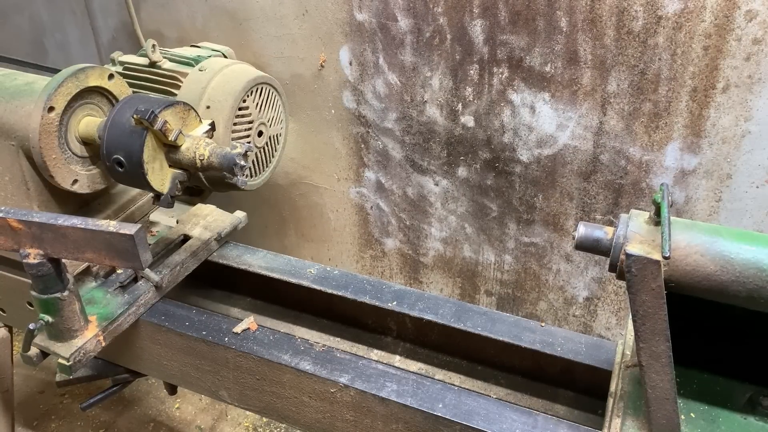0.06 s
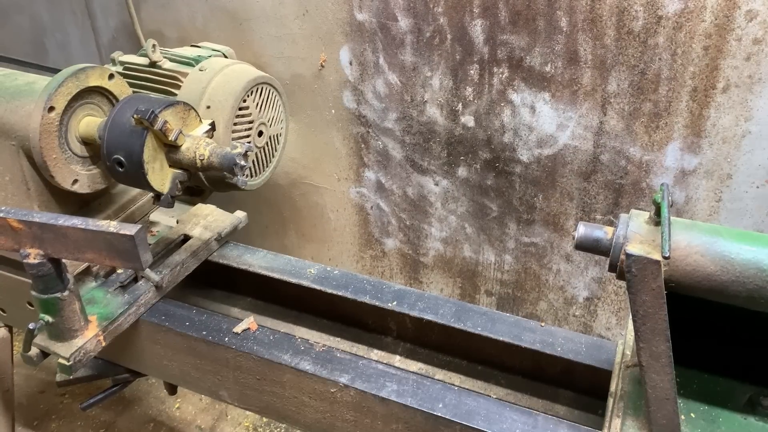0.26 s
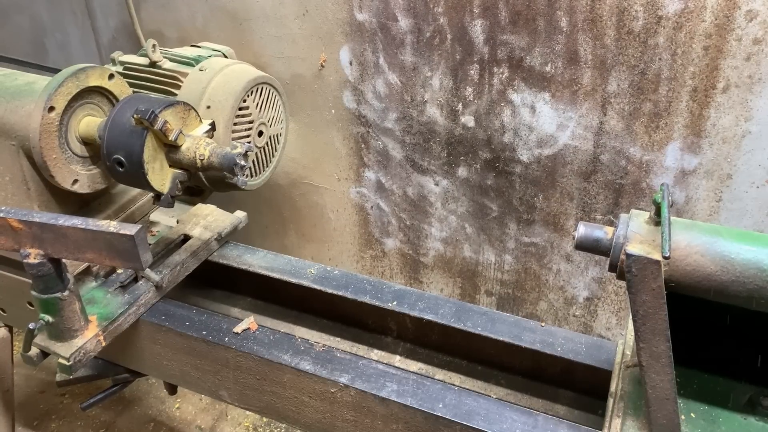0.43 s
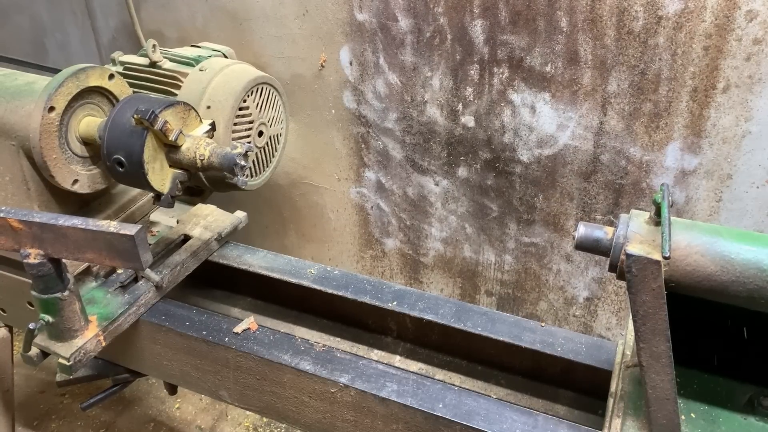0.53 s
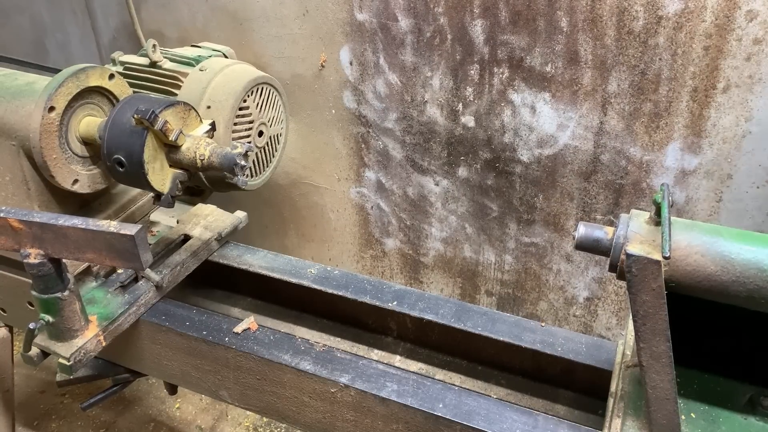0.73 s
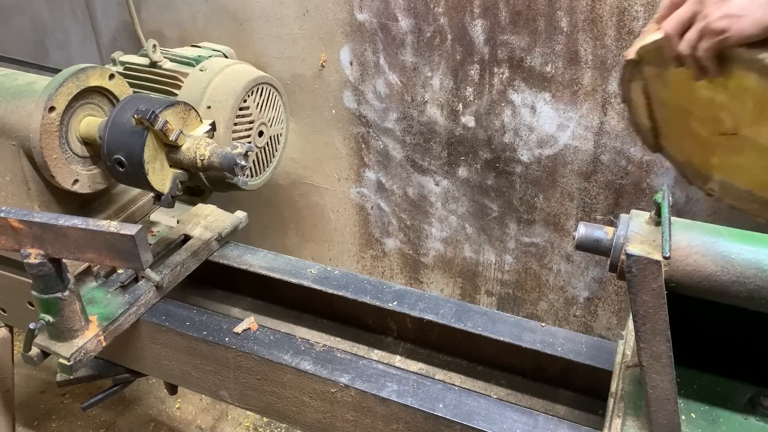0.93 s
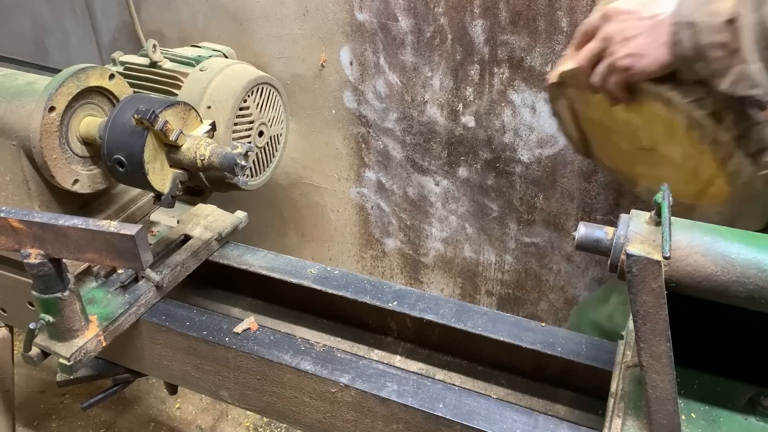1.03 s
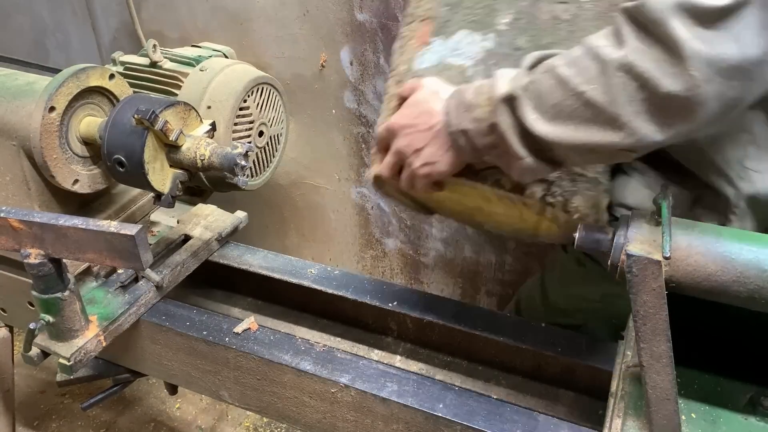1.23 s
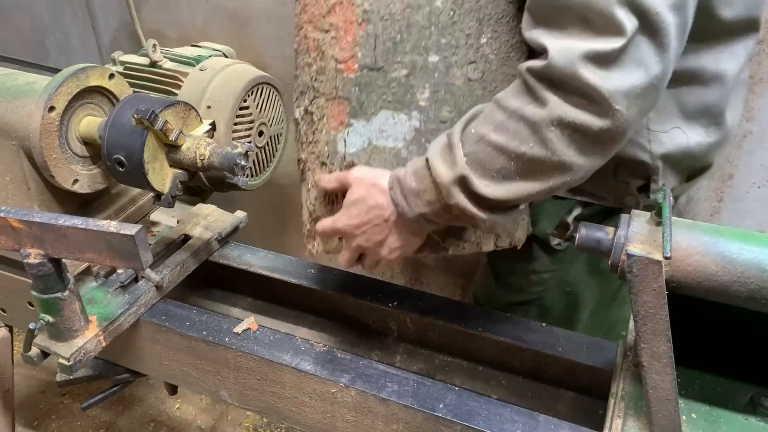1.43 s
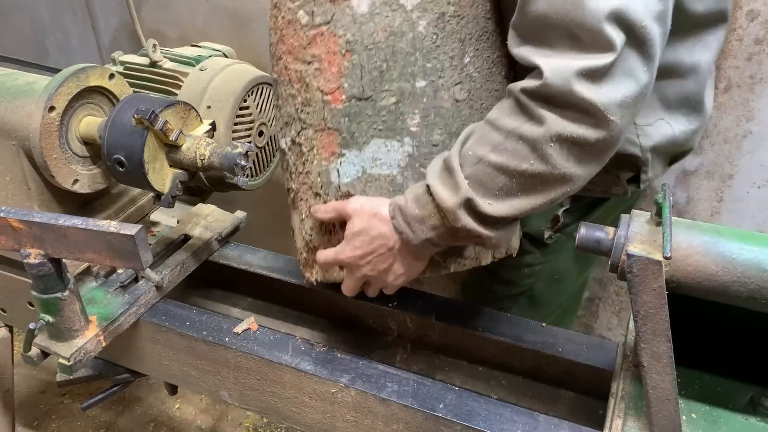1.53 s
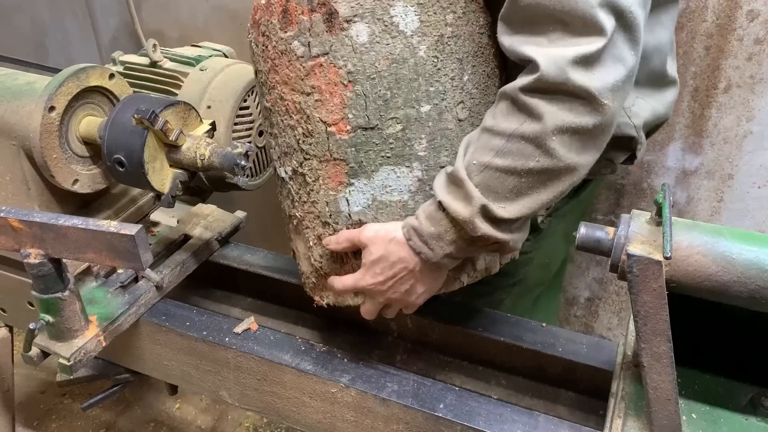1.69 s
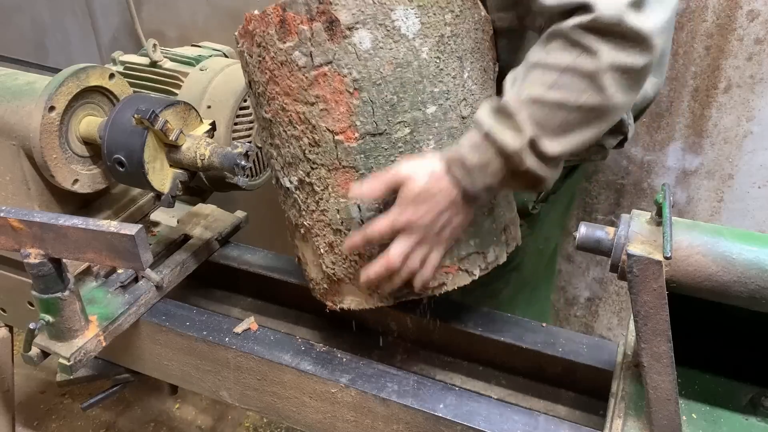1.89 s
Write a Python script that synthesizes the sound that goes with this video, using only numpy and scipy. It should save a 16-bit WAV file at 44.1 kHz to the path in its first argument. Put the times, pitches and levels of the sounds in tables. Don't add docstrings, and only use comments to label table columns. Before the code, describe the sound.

Loud clattering log knock near the start, smaller knocks just after, a tiny bird chirp outside, then sparse soft taps, scrapes and dull thuds in a lightly reverberant workshop, stereo phone pickup, left side softer.

```python
import sys
import numpy as np
from scipy import signal
from scipy.fft import rfft, irfft
from scipy.io import wavfile
from scipy.ndimage import uniform_filter1d

SR = 44100
rng = np.random.default_rng(int(sys.argv[2]) if len(sys.argv) > 2 else 0)


def to_linear_factor(level_db):
    exponent = np.asarray(level_db, float) / 20
    return 10 ** exponent


def transcribe(u):
    v = np.clip(np.atleast_2d(u).T, -1, 1)
    q = np.round(v * 32767).astype(np.int16)
    wavfile.write(sys.argv[1], SR, q)


N = 85995


def evened(x):
    return x / np.sqrt(np.mean(x ** 2) + 1e-20)


def smooth_noise(shape, size):
    return evened(uniform_filter1d(rng.standard_normal(shape), size=size))


def read(points, hz):
    f, value = np.transpose(points)
    return np.interp(np.log(hz + 1), np.log(f + 1), value)


def add(mix, s, sound):
    part = mix[..., round(s * SR):][..., :sound.shape[-1]]
    part += sound[..., :part.shape[-1]]


def ring(hz, t60, rise_s=0.):
    t = np.arange(round(t60 * SR)) / SR
    rise = np.minimum(t / (rise_s + 1e-9), 1)
    return to_linear_factor(-60 * t / t60) * np.sin(2 * np.pi * hz * t) * rise


def resonate(x, hz, width_hz):
    r = np.exp(-np.pi * width_hz / SR)
    return signal.lfilter([1], [1, -2 * r * np.cos(2 * np.pi * hz / SR), r * r], x)


def air():
    # (frequency [Hz], level [dB per Hz])
    air_spectrum = [(12, -22), (20, -25.5), (99, -9.5), (551, -23), (616, -26), (1020, -28.5), (1560, -30),
                    (8170, -44.5), (16500, -55)]
    # (frequency [Hz], share [0-1])
    likeness = [(60, 0.397), (300, 0.25), (1500, 0.049)]
    air_db, patch_db = -58.5, 0.82
    hum_hz, hum_width_hz, hum_db = 90.4, 15, -64
    insect_hz, insect_width_hz, insect_db = 8200, 600, -81

    frames, hz = N // 256 + 5, np.fft.rfftfreq(1024, 1 / SR)
    a, b, c, d, patches = rng.standard_normal((frames, 513, 5)).T
    patches = uniform_filter1d(patches, size=14, axis=0)
    patches = evened(uniform_filter1d(patches, size=10, axis=1))
    same = np.clip(read(likeness, hz), -1, 1)[:, None]
    left = a + 1j * b
    right = same * left + np.sqrt(1 - same ** 2) * (c + 1j * d)
    z = np.array([left, right]) * to_linear_factor(read(air_spectrum, hz)[:, None] + patch_db * patches)
    wash = evened(signal.istft(z, nperseg=1024, noverlap=768)[1][:, :N])

    noise = rng.standard_normal((3, N))
    hum = resonate(noise[0] + noise[1:] / 2, hum_hz, hum_width_hz)
    hum = evened(resonate(hum, hum_hz, 2 * hum_width_hz))
    insects = resonate(noise[1:], insect_hz, insect_width_hz)
    insects = evened(resonate(insects, insect_hz, insect_width_hz))
    return to_linear_factor(air_db) * wash + to_linear_factor(hum_db) * hum + to_linear_factor(insect_db) * insects


def bird():
    # (time [s], length [s], level [dB], start pitch [Hz], end pitch [Hz])
    chirps = [
        (0.5, 0.01, -61.5, 8300, 7960),
        (0.511, 0.0306, -69, 7270, 6870),
        (0.567, 0.01768, -60.5, 4994, 4490),
        (0.583, 0.0047, -60.5, 4680, 3810),
        (1.005, 0.0153, -75, 7200, 7100),
        (1.082, .025, -75.5, 7200, 7060),
        (1.130, .02, -78, 8300, 8100),
    ]
    out = np.zeros(N)
    for s, length_s, db, from_hz, to_hz in chirps:
        u = np.arange(round(length_s * SR)) / (length_s * SR)
        flutter = 1 + 0.4 * smooth_noise(len(u), 60)
        phase = 2 * np.pi * np.cumsum(from_hz + (to_hz - from_hz) * u) / SR
        add(out, s, to_linear_factor(db) * flutter * np.sin(np.pi * u) * np.sin(phase))
    return out


def scuffs():
    # (peak time [s], rise [s], fall t60 [s], level [dB], body [Hz])
    bark_scuffs = [(0.199, 0.012, 0.2, -44, 3900), (0.223, 0.013, 0.15, -37.5, 8900),
                   (0.110, 0.07, 0.37, -74, 8840), (1.080, 0.14, 0.95, -67, 3500),
                   (0.401, 0.026, 0.2, -50.5, 1750), (0.419, 0.0079, 0.12, -46.5, 8370),
                   (0.429, 0.039, 0.16, -46, 3200), (0.470, 0.068, 0.31, -63.5, 864),
                   (0.786, 0.002, 0.13, -63, 5730), (0.870, 0.035, 0.35, -55.5, 3100),
                   (0.887, 0.0016, 0.18, -47.5, 2170), (0.940, 0.01, 0.061, -61, 1500),
                   (1.054, 0.037, 0.265, -75, 7340), (1.135, 0.04, 0.145, -71, 7730),
                   (1.248, 0.0084, 1, -63.5, 1475), (1.376, 0.0099, 0.6, -58.5, 2866),
                   (1.384, 0.00176, 0.072, -51, 10200), (1.389, .003, 0.049, -45.5, 6340),
                   (1.410, .012, 0.131, -57.5, 7300), (1.482, 0.11, 0.33, -63, 1200),
                   (1.651, 0.005, 0.36, -62.5, 6570), (1.700, 0.046, 0.27, -57, 2470),
                   (1.949, 0.024, 0.25, -59.5, 3400)]
    # (peak time [s], rise [s], fall t60 [s], level [dB], body [Hz])
    wood_drags = [(0.029, 0.0015, 0.21, -60, 2884), (0.044, 0.015, 0.045, -56.5, 870),
                  (0.222, 0.007, 0.188, -28, 1420), (0.260, .03, 0.43, -46, 711),
                  (0.412, 0.0053, 0.1, -39, 1940), (0.728, 0.007, 0.0565, -58, 1940),
                  (0.960, 0.083, 0.41, -61.5, 346), (1.054, 0.036, 0.088, -57.5, 500),
                  (1.135, 0.035, 0.19, -63, 915), (1.192, 0.0049, 0.21, -54, 798),
                  (1.647, 0.0063, 0.3, -53, 440), (1.849, 0.004, 0.063, -57, 1530),
                  (1.675, 0.044, 0.151, -58.5, 1748), (0.400, .08, 0.46, -46, 228),
                  (1.715, .02, 0.14, -52, 597), (0.350, 0.035, 0.38, -53, 1080)]
    bark_slope_db, drag_slope_db = -5, -8.5
    low_slope_db, low_floor_db = 14, -10
    peak_db, peak_octaves = 4, 0.25
    clicks_per_s, grain_db, clump_db = 12000, 1, 2
    lead_s = 0.1

    out, size = np.zeros((2, N)), 16384
    t, hz = np.arange(size) / SR - lead_s, np.fft.rfftfreq(size, 1 / SR)
    strokes = [(*row, bark_slope_db) for row in bark_scuffs] + [(*row, drag_slope_db) for row in wood_drags]
    for s, rise_s, t60, db, body_hz, high_slope_db in strokes:
        hit = rng.random((2, size)) < clicks_per_s / SR
        grain = to_linear_factor(grain_db * np.minimum(rng.exponential(1, (2, size)), 4))
        clicks = hit * rng.standard_normal((2, size)) * grain
        clumps = to_linear_factor(clump_db * smooth_noise(size, 180))
        octaves = np.log2((hz + 20) / body_hz)
        below_db = np.maximum(low_slope_db * octaves, low_floor_db + octaves)
        skirt_db = np.where(octaves < 0, below_db, high_slope_db * octaves)
        colour = to_linear_factor(skirt_db + peak_db * np.exp(-(octaves / peak_octaves) ** 2))
        stroke = np.where(t < 0, np.exp(-2 * (t / rise_s) ** 2), to_linear_factor(-60 * t / t60))
        sound = to_linear_factor(db) * stroke * evened(irfft(rfft(clicks * clumps) * colour))
        skip = max(round((lead_s - s) * SR), 0)
        add(out, max(s - lead_s, 0), sound[:, skip:])
    return out


def taps():
    # (time [s], level [dB], pitch [Hz], t60 [s])
    wood_taps = [(0.345, -36, 487, 0.085), (0.345, -39, 1098, 0.046), (0.375, -32.5, 996, 0.024),
                 (0.412, -41, 2350, 0.0176), (0.724, -64, 1895, 0.05), (0.738, -45.5, 583, 0.047),
                 (0.858, -59, 3450, 0.0164), (0.868, -59, 3370, 0.012), (0.885, -38.5, 2124, 0.042),
                 (0.889, -44.5, 3020, 0.035), (0.887, -51, 5807, .03), (0.905, -45.5, 2016, 0.0166),
                 (0.928, -42, 1578, 0.035), (0.936, -43, 1512, 0.026), (0.943, -41.5, 1360, 0.017),
                 (1.052, -51.5, 440, 0.0108), (1.193, -41.5, 1190, 0.0097), (1.205, -49, 885, 0.039),
                 (1.191, -48.5, 292, 0.067), (1.228, -45.5, 325, 0.031), (1.386, -51.5, 764, 0.052),
                 (1.384, -48, 1285, 0.034), (1.641, -52.5, 600, .03), (1.648, -48, 400, 0.05),
                 (1.650, -51, 793, 0.0073), (1.681, -46, 449, 0.094), (1.682, -52, 2570, .03),
                 (1.696, -42.5, 4790, .02), (1.706, -42, 247, 0.1), (0.499, -52.5, 3200, 0.025),
                 (1.708, -53, 5290, 0.042), (1.712, -33.5, 990, 0.0197), (1.721, -43, 2490, 0.013),
                 (1.727, -56, 1112, 0.025), (1.742, -57, 928, 0.018), (1.844, -46, 916, 0.028),
                 (1.848, -52.5, 524, 0.027)]
    spread, rough = 0.026, 0.5
    tick_db, tick_t60_s = -22, 0.012

    out, t = np.zeros(N), np.arange(441) / SR
    for s, db, hz, t60 in wood_taps:
        tick = evened(resonate(rng.standard_normal(len(t)), 2 * hz, 3 * hz))
        upper = ring(hz * (1 + spread), t60, 0.000576)
        lower = ring(hz * (1 - spread), t60 / 2, 0.0017)
        add(out, s, to_linear_factor(db) * upper * (1 + rough * smooth_noise(len(upper), 90)))
        add(out, s, to_linear_factor(db - 1.5) * lower)
        add(out, s, to_linear_factor(db + tick_db - 60 * t / tick_t60_s) * tick)
    return out


def thuds():
    # (time [s], level [dB], pitch [Hz], t60 [s])
    floor_thuds = [(0.029, -46, 110, 0.13), (0.222, -17, 57.7, .22), (0.222, -16.5, 118, 0.12),
                   (0.227, -22, 35.4, 0.132), (0.301, -28, 119.7, 0.24), (0.308, -28, 41.5, 0.12),
                   (0.649, -47, 75, 0.17), (1.702, -50, 55.6, 0.14), (0.363, -26, 109, 0.083),
                   (0.400, -40, 35.5, .12), (0.478, -40, 90.7, 0.18), (0.720, -40, 82.3, 0.13),
                   (0.902, -47, 75.7, 0.165), (0.939, -48.5, 84.5, 0.12825), (1.052, -49, 86.6, 0.22),
                   (1.098, -49.5, 84.3, 0.18), (1.261, -40.5, 90.5, 0.089), (1.422, -40, 99, 0.062),
                   (1.591, -51, 91, 0.14), (1.759, -44.5, 98.5, 0.155), (1.852, -41.5, 72.5, 0.076),
                   (0.95, -41, 404, 0.038), (0.902, -48, 190.6, 0.05)]
    rise_s, lag_spread_s = 0.0034, 0.0011
    out = np.zeros((2, N))
    for (s, db, hz, t60), lag in zip(floor_thuds, rng.standard_normal(len(floor_thuds))):
        thud = to_linear_factor(db) * ring(hz, t60, rise_s)
        add(out[0], s + lag_spread_s * lag, thud)
        add(out[1], s, thud)
    return out


def knock():
    # (time [s], strength [dB], hardness [Hz])
    contacts = [(0.2046, -32.5, 3000), (0.2088, -28, 6000), (0.2091, -22, 10020), (0.2104, -15, 8500),
                (0.2116, -10, 2650), (0.2171, -16, 1920), (0.2211, -16, 1600), (0.2290, -19, 1320),
                (0.2335, -14.5, 1283), (0.2400, -14, 1480), (0.2545, -15.5, 1270), (0.2661, -20, 1500),
                (0.2800, -21.5, 1200), (0.2909, -23.5, 1200), (0.3100, -27.5, 1090), (0.3300, -27, 1100)]
    # (frequency [Hz], level [dB], t60 [s])
    modes = [(223, -6, .07), (308, -5, .05), (400, -4, 0.056), (485, -3, 0.05), (631, -5.5, 0.052),
             (710, -8.5, .06), (766.4, -3, .06), (873, -4, 0.046), (990, -9.5, 0.045), (1203, -3.5, .05),
             (1600, -3.5, .05), (1741, -3, 0.035), (2305, 0.5, 0.033), (2835, -5.5, 0.03)]
    mode_spread, ring_max_s, rattle = 0.035, 0.06, 0.5
    crack_db, crack_t60_s, crack_low_hz = -1, 0.032, 1200

    out, t = np.zeros((2, N)), np.arange(4410) / SR
    high_b, high_a = signal.butter(2, crack_low_hz, "high", fs=SR)
    for s, db, hard_hz in contacts:
        body = np.zeros((2, SR // 4))
        for hz, mode_db, t60 in modes:
            g = rng.standard_normal(3)
            mode = ring(hz * (1 + mode_spread * g[2]), min(t60, ring_max_s), 0.0013)
            chatter = 1 + rattle * smooth_noise((2, len(mode)), 260)
            add(body, 0, to_linear_factor(mode_db + g[:2])[:, None] * mode * chatter / 2)
        crack = signal.lfilter(high_b, high_a, rng.standard_normal((2, len(t))))
        add(body, 0, crack * to_linear_factor(crack_db - 60 * t / crack_t60_s))
        r = np.exp(-2 * np.pi * hard_hz / SR)
        dulled = signal.lfilter([1 - r], [1, -r], body)
        add(out, s, to_linear_factor(db) * signal.lfilter([1 - r], [1, -r], dulled))
    return out


def room(x):
    # (frequency [Hz], t60 [s])
    decay = [(100, 0.6), (500, 0.25), (1500, 0.24), (4000, 0.22), (12000, 0.076)]
    sparse = np.zeros((2, SR))
    starts = np.arange(132, SR - 20, 20)
    at = starts + rng.integers(0, 20, (2, len(starts)))
    np.put_along_axis(sparse, at, rng.choice([-1., 1.], at.shape), 1)
    hz, t, z = signal.stft(sparse, SR, nperseg=256)
    tail = signal.istft(z * to_linear_factor(-60 * t / read(decay, hz)[:, None]), SR, nperseg=256)[1]
    return signal.fftconvolve(x, tail / np.linalg.norm(tail[0]), axes=1)[:, :N]


def scene():
    left_db, knock_lag_s, tap_lag_s = -3, -0.00116, -0.0003
    background, birds = air(), bird()
    rubs = scuffs() * to_linear_factor(np.array([[-1.5], [0]]))
    small, low, blow = taps(), thuds(), knock()
    left = np.roll(blow[0], round(knock_lag_s * SR)) + low[0] + np.roll(small, round(tap_lag_s * SR))
    direct = np.array([to_linear_factor(left_db) * left, blow[1] + low[1] + small])
    far = to_linear_factor(-9) * blow + to_linear_factor(-12) * low + to_linear_factor(-13) * small + to_linear_factor(-5.5) * rubs + to_linear_factor(1.0) * birds
    return direct + rubs + birds * to_linear_factor(6.0) + room(far) + background


def low_pass(x):
    return signal.sosfilt(signal.butter(12, 16660, fs=SR, output="sos"), x)


def record(dry):
    duck_from_db, duck_share, recover_db_per_s = -38, 0.59, 69.5
    mic_top_hz, mic_edge_hz = 14400, 16050
    power_db = 10 * np.log10(abs(uniform_filter1d((dry ** 2).mean(0), size=400)) + 1e-12)
    fall_db = np.arange(N) * recover_db_per_s / SR
    held_db = np.maximum.accumulate(power_db + fall_db) - fall_db
    over_db = np.maximum(held_db - duck_from_db, 0)
    late_db = signal.lfilter([1 / 882], [1, 1 / 882 - 1], over_db)
    ducked = dry / to_linear_factor(duck_share * late_db)
    mic = signal.firwin2(255, [0, mic_top_hz, mic_edge_hz, mic_edge_hz + 500, SR / 2],
                         [1, 1, 0.0, 0.14, 0], fs=SR)
    return low_pass(signal.oaconvolve(ducked, mic[None], "same"))


dry = scene()
out = record(dry)
transcribe(out)
```